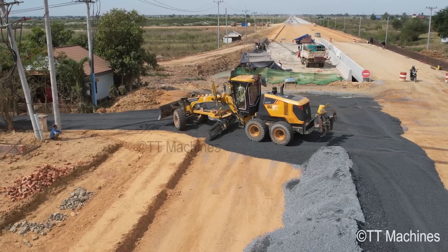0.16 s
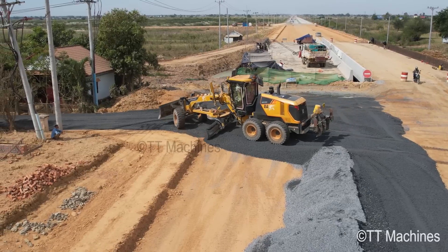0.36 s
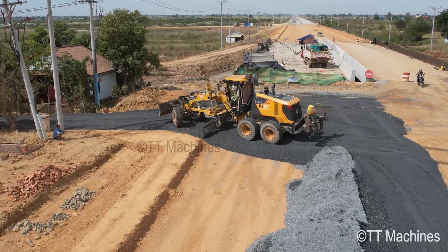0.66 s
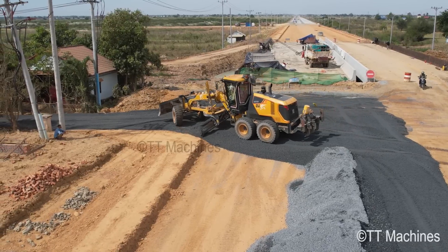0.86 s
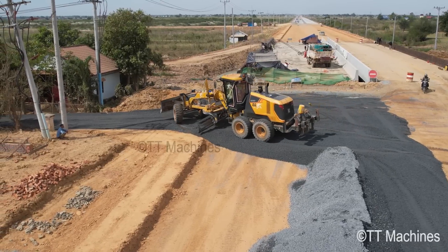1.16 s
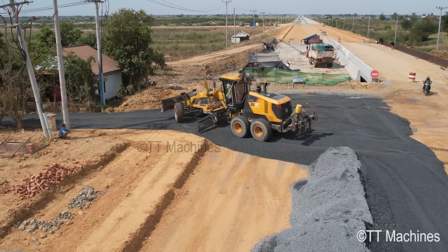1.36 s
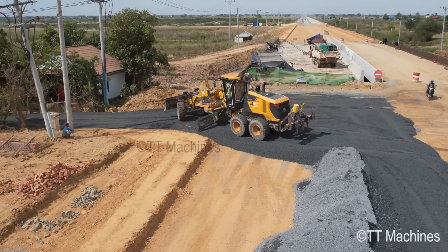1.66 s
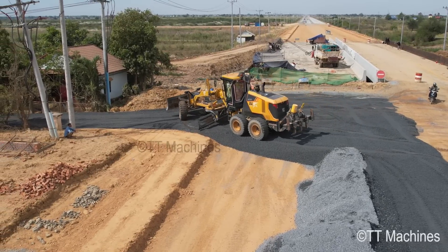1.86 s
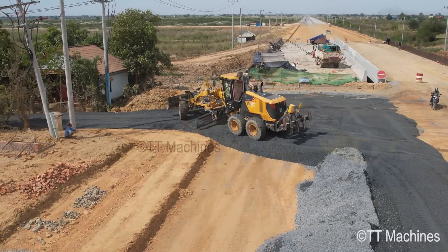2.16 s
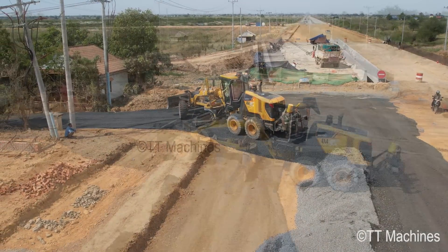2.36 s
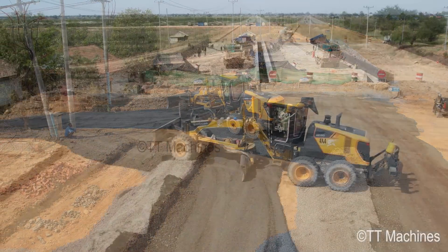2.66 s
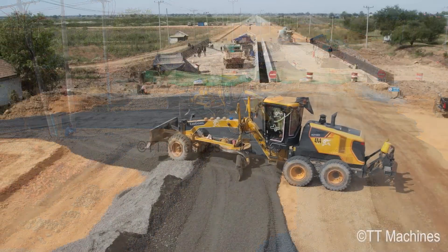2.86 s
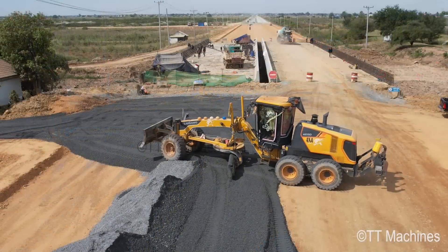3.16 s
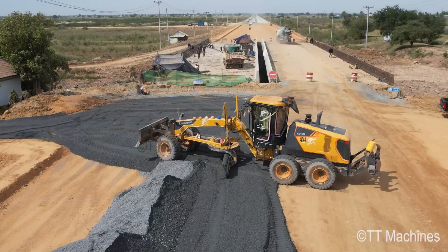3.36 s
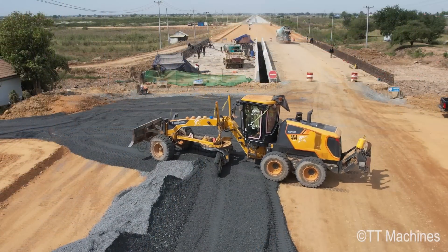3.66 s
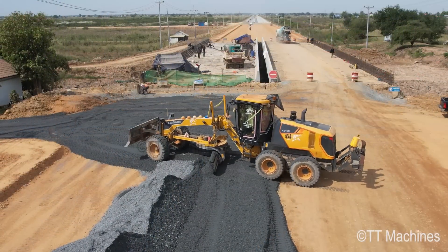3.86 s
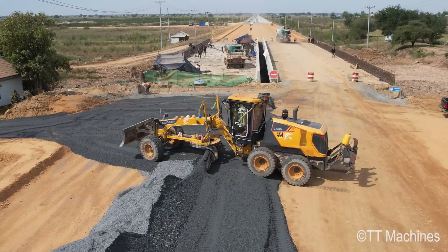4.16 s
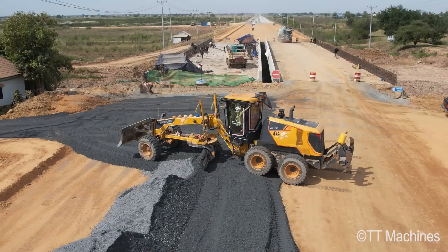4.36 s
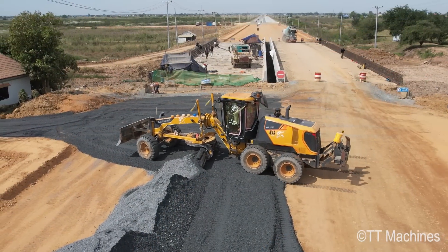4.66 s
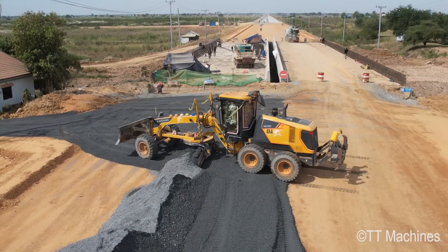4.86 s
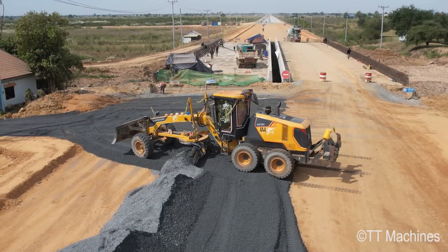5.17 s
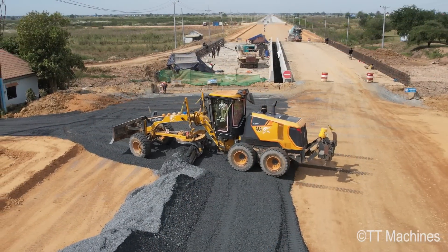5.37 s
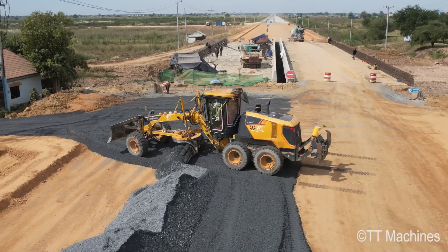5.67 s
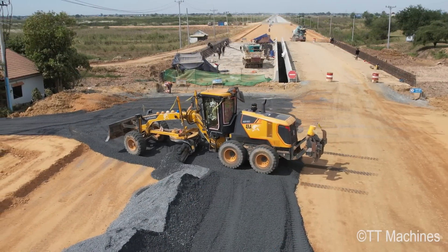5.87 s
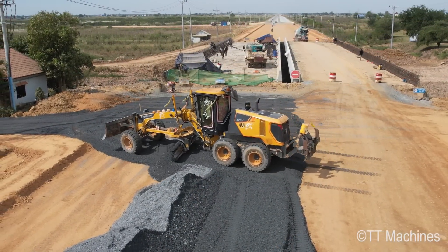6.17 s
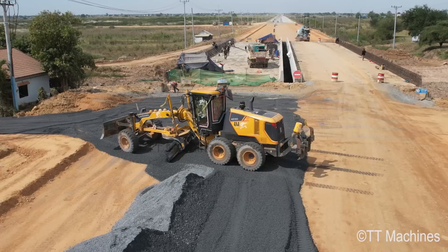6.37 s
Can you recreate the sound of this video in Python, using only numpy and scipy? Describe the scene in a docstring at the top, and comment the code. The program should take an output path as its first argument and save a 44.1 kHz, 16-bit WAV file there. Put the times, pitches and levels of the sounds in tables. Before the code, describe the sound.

A heavy diesel machine pulls hard with whining gears, drops abruptly to a duller run, two stones crack, then the exhaust boom builds again over scraping gravel.

```python
"""Road grader spreading gravel

A six-cylinder diesel road grader works on an open site, some way off. It first pulls hard, with gears,
pump and turbocharger singing, then drops abruptly to a duller run. Two stones crack, and the exhaust
boom builds up again as the blade pushes into the heap. Shaped noise makes the boom, roar, clatter,
hiss and scraping; trembling sine waves make the whines; short fading sines make the cracks."""
import sys
import numpy as np
from scipy import signal
from scipy.fft import rfft, irfft
from scipy.io import wavfile
from scipy.ndimage import uniform_filter1d

SR = 44100
rng = np.random.default_rng(int(sys.argv[2]) if len(sys.argv) > 2 else 0)


def master(y):
    """Save y as 16-bit WAV."""
    cut = np.clip(np.atleast_2d(y).T, -1, 1)
    pcm = np.round(cut * 32767)  # scale
    wavfile.write(sys.argv[1], SR, pcm.astype(np.int16))


N = 286650
TIME = np.arange(N) / SR

DROP_S = 1.922  # the hard pull ends here
BITE_S, BITE_RISE_S = 3.23, 0.27  # middle and length of the blade's bite into the heap

# exhaust boom around the firing rate: (frequency [Hz], relative level [dB per Hz])
BOOM_SPECTRUM = [(50, -40), (66, -9), (78, -3), (90, -0.5), (105, -1), (120, -4.5), (138, -11.5),
                 (175, -24)]
# the push: (time [s], share of the pushing state [0-1], colour shift by the moving ground echo [factor])
PUSH_STATE = [(2.4, 0, 0.85), (3.0, 0.4, 1.055), (3.6, 0.72, 1.06), (4.3, 0.77, 1.004), (5.2, 0.95, 1.015),
              (6.5, 1, 1.005)]
# which ear leads in phase, in the hard pull and the eased run:
# (frequency [Hz], lead [-1 left to 1 right])
HARD_EAR_LEAD = [(90, .2), (300, .8), (700, .92), (1300, .77), (1700, .3), (2400, .45), (3500, -.5),
                 (5400, -.35), (6100, -.68), (7400, -.55), (8300, .2), (9500, .83), (12000, 0)]
EASED_EAR_LEAD = [(90, 0), (1100, 0), (1750, .7), (2300, .1), (3100, -.7), (3900, 0), (6500, -.2),
                  (7400, -.4), (8300, .2), (9500, .83), (12000, 0)]


def gain_of(db):
    """Turns decibels into an amplitude factor."""
    return 10 ** (np.asarray(db) / 20)


def curve(rows):
    """Joins the points of a time table by straight lines, one curve per column."""
    s, *columns = np.transpose(rows)
    return [np.interp(TIME, s, column) for column in columns]


def read(rows, hz):
    """Reads a spectrum table along log frequency; outside it the level falls 40 dB per octave."""
    f, *columns = np.transpose(rows)
    db, *others = [np.interp(np.log(hz + 1), np.log(f), column) for column in columns]
    octaves_outside = np.abs(np.log2((hz + 1) / np.clip(hz + 1, f[0], f[-1])))
    return [db - 40 * octaves_outside] + others


def swell(middle, length):
    """A smooth hump from 0 to 1 and back."""
    return np.cos(np.pi * np.clip((TIME - middle) / length, -.5, .5)) ** 2


def rise(middle, length):
    """A straight ramp from 0 to 1."""
    return np.clip((TIME - middle) / length + .5, 0, 1)


def sway(crest, period):
    """A slow regular swing between -1 and 1."""
    return np.cos(2 * np.pi * (TIME - crest) / period)


def wander(hz):
    """Smooth random drift of rms 1, with little movement faster than hz."""
    f = np.fft.rfftfreq(N, 1 / SR)
    x = irfft(rfft(rng.standard_normal(N)) * np.exp(-(f / hz) ** 2), N)
    return x / x.std()


def steadied(x, seconds):
    """Evens out a stereo sound: divides it by the running rms of its left-right mean."""
    window = signal.windows.hann(int(seconds * SR) + 3)
    power = signal.fftconvolve(x.mean(0) ** 2, window, "same")
    power = power / signal.fftconvolve(np.ones(N), window, "same")
    return x / np.sqrt(np.abs(power) + 1e-20)


def panned(x, balance_db):
    """Places a sound between left and right; a positive balance makes the left louder."""
    return np.array([x * gain_of(balance_db / 2), x / gain_of(balance_db / 2)])


def noise(rows, likeness=.9, patchy_db=0., shift=None, lead=None, size=2048):
    """Stereo noise of a given spectrum, built from random short-time spectra with drifting patches.

    shift moves the spectrum up or down in time; lead turns the phase between the ears."""
    hop = size // 4
    frames, hz = N // hop + 2, np.fft.rfftfreq(size, 1 / SR)
    slide = np.ones(1) if shift is None else shift[np.minimum(np.arange(frames) * hop, N - 1)]
    db, *stereo = read(rows, hz / slide[:, None])
    same, balance_db = stereo or (likeness, 0)
    same = np.clip(same, -1, 1)
    ahead = 0 if lead is None else np.interp(hz, *np.transpose(lead))

    a, b, c, d, patches = rng.standard_normal((5, frames, len(hz)))
    patches = uniform_filter1d(patches, size=7, axis=0)  # smooth in time
    patches = uniform_filter1d(patches, size=12, axis=1)  # smooth in frequency
    level_db = db + patchy_db * patches / patches.std()

    # the right ear shares part of the left; the rest is turned in phase or independent
    left = a + 1j * b
    unlike = 1j * ahead * left + np.sqrt(1 - ahead ** 2) * (c + 1j * d)
    right = same * left + np.sqrt(1 - same ** 2) * unlike
    tilt = gain_of(balance_db)
    z = np.array([left * tilt, right]) / np.sqrt(1 + tilt ** 2) * gain_of(level_db)
    x = signal.istft(z.swapaxes(1, 2), nperseg=size, noverlap=size - hop)[1][:, :N]
    return x / x.mean(0).std()


def firing_throb(firings, depth, scatter):
    """Loudness that throbs with each firing; the strength varies at random between firings."""
    strength = 1 + scatter * rng.standard_normal(1000)
    return 1 + depth * strength[firings.astype(int)] * (1 - np.cos(2 * np.pi * firings))


def hum(firings, orders, flutter):
    """Clean shaft tones, each fluttering a little on its way through the air."""
    tones = 0
    for multiple, db in orders:
        phase = 2 * np.pi * (multiple * firings + rng.random())
        steady = (1 + flutter * wander(4.6)) * np.sin(phase)
        tones = tones + gain_of(db) * (steady + flutter * wander(7.0) * np.cos(phase))
    return tones


def whistle(hz, db, jitter, flutter_db):
    """A sine tone whose pitch and strength tremble; db is its rms level before the trembling."""
    phase = 2 * np.pi * np.cumsum(hz * (1 + jitter * wander(38.1))) / SR
    return np.sqrt(2) * gain_of(db + flutter_db * wander(28)) * np.sin(phase)


def resonate(x, hz, width):
    """Shifts the curve hz down to zero, smooths twice, and shifts back: a steep moving resonance."""
    turn = np.exp(2j * np.pi * np.cumsum(hz) / SR)
    r = np.exp(-np.pi * width / SR)
    y = (turn * signal.lfilter([1], [1, -2 * r, r * r], x / turn)).real
    return y / y.std()


def rumble():
    """The machine's weight shakes the ground in slow surges: deep noise with a moving level."""
    # loudness: (time [s], level [dB])
    loudness = [(0, -36), (1.5, -31.5), (2.5, -45.5), (3.3, -40), (4.1, -43), (4.9, -32.5), (6.5, -37.5)]
    # colour: (frequency [Hz], relative level [dB per Hz])
    spectrum = [(25, -36), (35, -21), (45, -14), (54, -7), (63, -1.5), (76, -23)]
    x = noise(spectrum, likeness=0.75, size=8192)
    return gain_of(curve(loudness)[0]) * steadied(x, 0.27)


def clatter_fill():
    """Soft mid-range noise fills the light clatter until the bite, with one short swell of treble."""
    # mid-range fill and treble swell: (frequency [Hz], relative level [dB per Hz])
    fill_spectrum = [(1450, -13), (1750, -2), (2080, -4), (2300, -10)]
    treble_spectrum = [(3000, -8), (3450, 2), (4000, -1), (5000, -11), (6000, -8), (6900, -2), (7800, -9),
                       (9000, -11)]
    fill = noise(fill_spectrum, likeness=.8, patchy_db=3.0)
    fill = gain_of(-47) * (1 - rise(BITE_S, BITE_RISE_S)) * fill
    treble = noise(treble_spectrum, likeness=.2, lead=EASED_EAR_LEAD)
    return fill + gain_of(-44.5) * swell(2.3, .7) * treble


def whines():
    """Thin, trembling tones of the machine and its blade surface from the clatter and sink back."""
    # (start [s], end [s], centre pitch [Hz], level before panning [dB])
    tones = [(2.0, 3.2, 610, -51), (2.0, 3.1, 975, -53), (2.0, 2.35, 1378, -51), (2.05, 2.4, 1075, -49),
             (2.15, 2.48, 2822, -49.5), (2.3, 4.5, 2450, -49.5), (2.68, 3.12, 1398, -47.5),
             (2.0, 4.0, 1287, -52), (3.1, 5.7, 1882, -56), (3.25, 4.0, 2342, -52), (4.25, 6.6, 2322, -53),
             (4.1, 6.6, 1653, -59), (4.7, 6.6, 1556, -56), (4.2, 6.6, 3308, -59)]
    fade_s = 0.13
    out = 0
    for start, end, hz, db in tones:
        gate = rise(start, fade_s) * (1 - rise(end, fade_s))
        pitch = hz * (1 + .0015 * wander(4))
        out = out + gate * whistle(pitch, db, jitter=0.003, flutter_db=3)
    return panned(out, -8.5)


def drone():
    """The loaded frame drones a little above the exhaust boom as the blade fills."""
    # (frequency [Hz], relative level [dB per Hz])
    spectrum = [(118, -28), (143, 2), (170, 2), (200, -19)]
    x = steadied(noise(spectrum, likeness=1.0, size=8192), 0.36)
    return gain_of(-35) * rise(4.8, 1.1) * x


def stones():
    """Stones crack under the tyres: each sharp tick falls from treble to a short knock."""
    # the cracks: (time [s], peak level before panning [dB], left-right balance [dB])
    cracks = [(2.7425, -12.6, 1.5), (2.7878, -21, 1.5)]
    # ringing; the lower modes start later:
    # (frequency [Hz], relative level [dB], time to fade by 60 dB [s], delay [s])
    modes = [(400, -8, .008, .0012), (900, -3.5, .007, .001), (1500, -4, .005, .001),
             (2400, -6, .004, .001), (3750, -1.5, .006, .0006), (5000, -2.5, .004, .0004),
             (5700, -2.5, .004, .0003), (7500, 1, .003, .0001), (8300, 0, .003, 0), (9100, 0, .003, 0),
             (10100, -6, .003, 0), (13200, -9, .003, 0)]
    t = np.arange(SR // 50) / SR
    tick = 0
    for hz, db, t60, delay in modes:
        age = np.maximum(t - delay, 0)
        attack = 1 - np.exp(-age / .00025)
        ring = np.sin(2 * np.pi * (hz * age + rng.random()))
        tick = tick + attack * gain_of(db - 60 * age / t60) * ring
    tick = tick / np.abs(tick).max()

    out = np.zeros((2, N))
    for s, db, balance_db in cracks:
        start = round(s * SR)
        out[:, start:start + len(t)] += panned(gain_of(db) * tick, balance_db)
    return out


def scraping():
    """How hard the gravel rubs the blade: lightly after the bite, in shoves once it is full."""
    # shoves of gravel against the full blade: (middle [s], length [s], rise [dB])
    shoves = [(5.03, .3, 10.5), (5.42, .3, 10), (5.77, .28, 11.5), (6.1, .2, 8.5), (6.48, .3, 9.5)]
    light_db, full_db = -50, -48.5
    full = rise(4.9, 0.18)
    shoves_db = sum(db * np.sqrt(swell(s, length)) for s, length, db in shoves)
    level_db = (1 - full) * light_db + full * full_db + shoves_db
    return np.clip((TIME - BITE_S) / 1.1, 0, 1) * gain_of(level_db)


def blade():
    """Scraping gravel keeps the blade's modes ringing, and its clearest note grows with each shove."""
    # ringing: (pitch before the colour shift [Hz], width [Hz], relative level [dB], left-right balance [dB])
    modes = [(1082, 77, -0.5, -1), (2306, 43, -10, -4), (2890, 110, -11.5, -3), (3313, 45, -13.5, -6),
             (4070, 130, -26, 3), (4430, 62, -19, 8)]
    shift = curve(PUSH_STATE)[1] * (1 + 0.0084 * wander(5.1))
    ring = 0
    for hz, width, db, balance_db in modes:
        mode = resonate(rng.standard_normal(N), hz * shift, width)
        ring = ring + panned(gain_of(db) * mode, balance_db)
    # the note's level is relative to the scraping
    note = whistle(1155 * (1 + .003 * wander(5)), -4.5, jitter=.004, flutter_db=2)
    return scraping() * (ring + note)


def squeaks():
    """Now and then a thin tone glides in pitch, swelling and fading as it goes."""
    # faint gliding squeaks near 2.9 kHz:
    # (start [s], length [s], start pitch [Hz], end pitch [Hz], level at the middle before panning [dB])
    glides = [(2.73, .18, 2780, 2950, -47.5), (3.15, .16, 2790, 2950, -47), (3.51, .14, 2780, 3010, -44),
              (4.5, .2, 2910, 2880, -48), (4.88, .15, 2720, 2980, -45), (5.94, .14, 2680, 3000, -44.5),
              (6.11, .16, 3020, 2700, -44.5), (6.285, .14, 2740, 3020, -42)]
    out = 0
    for s, length, start_hz, end_hz, db in glides:
        u = np.clip((TIME - s) / length, 0, 1)  # progress through the squeak
        pitch = start_hz + (end_hz - start_hz) * u
        squeak = whistle(pitch, db, jitter=.006, flutter_db=2.4)
        out = out + panned(squeak * np.sin(np.pi * u), -4)
    return out


def gears():
    """Tooth-mesh whines follow the drive train's speed and swell and fade."""
    # drive train speed: (time [s], factor on the whines)
    drive = [(0, .988), (.35, .992), (.6, 1.002), (1.0, 1.005), (1.35, 1.004), (1.55, 1.002), (1.75, 1.007),
             (1.92, 1.001)]
    # the main mesh, loudest at first: (time [s], level before panning [dB])
    mesh = [(0, -31.5), (.22, -40.5), (.35, -36), (.48, -50), (.8, -47), (1.04, -38), (1.17, -42),
            (1.35, -35), (1.52, -47), (1.68, -40.5), (1.9, -52)]
    # whines: (pitch at drive factor 1 [Hz], left-right balance [dB], level before panning [dB],
    #          swing [dB], crest [s], period [s])
    gear_whines = [(803, -2, -39.5, 3.5, .8, 1.9), (2006, 0, -48.5, 2.5, .87, .6),
                   (3205, -3, -50.5, 1.5, .9, 1.8), (4302, -1, -52, 1.5, 1.2, 1.4)]
    ratio = curve(drive)[0] * (1 + 0.0005 * wander(3.13))
    main_mesh = whistle(1434 * ratio, curve(mesh)[0], jitter=0.0012, flutter_db=1.3)
    out = panned(main_mesh, -3)
    for hz, balance_db, db, swing_db, crest, period in gear_whines:
        level_db = db + swing_db * sway(crest, period)
        tone = whistle(hz * ratio, level_db, jitter=0.0018, flutter_db=2.0)
        out = out + panned(tone, balance_db)
    return out


def pump(firings):
    """The hydraulic pump growls at its piston rate; two harmonics throb once every two firings."""
    # (time [s], piston strokes [per s], growl level [dB],
    #  lower and upper harmonic levels before throb and panning [dB])
    strokes = [(0, 230.4, -37, -53, -49), (.22, 231.5, -33, -50, -40.5), (.4, 232.0, -35, -43.5, -47),
               (.54, 234.3, -35, -39.5, -44), (.76, 234.0, -28, -45, -42.5), (1.0, 235.7, -30, -55, -39.5),
               (1.14, 235.3, -32, -52, -54), (1.25, 234.6, -29, -46, -41.5), (1.36, 234.0, -32, -40, -44),
               (1.45, 233.5, -33, -50, -42), (1.56, 233.2, -31, -45.5, -42), (1.66, 234.0, -30, -43.5, -52),
               (1.76, 236.0, -24, -41, -38.5), (1.92, 235.1, -24.5, -38, -43.5)]
    rate, growl_db, lower_db, upper_db = curve(strokes)
    growl = whistle(rate, growl_db, jitter=0.012, flutter_db=1.5)
    throb = 1 + 0.45 * np.cos(np.pi * firings)
    tones = whistle(11 * rate, lower_db, jitter=0.0011, flutter_db=1.5)
    tones = tones + whistle(12 * rate, upper_db, jitter=0.0011, flutter_db=1.5)
    return growl + panned(throb * tones, -1.5)


def turbo(hz, db):
    """The compressor's wavering whistle, scattered differently towards each side."""
    hz = hz * (1 + 0.00157 * wander(6.25))
    direct = panned(whistle(hz, db - 1.0, jitter=0.00136, flutter_db=1.0), 9.1)
    scattered = [whistle(hz, db - 6.0, jitter=0.00299, flutter_db=3.5) for side in "LR"]
    return direct + np.array(scattered)


def loaded_turbo():
    """The turbocharger whistle sags in pitch under the load and surges in loudness."""
    # (time [s], pitch [Hz])
    pitch = [(0, 7228), (.28, 7218), (.65, 7180), (1.0, 7162), (1.3, 7125), (1.6, 7162), (1.92, 7150)]
    # (middle [s], length [s], rise [dB])
    surges = [(.27, 0.85, 8), (1.107, 1, 9), (1.792, 0.41, 8.5)]
    level_db = -44 + sum(db * swell(s, length) for s, length, db in surges)
    return turbo(curve(pitch)[0], level_db)


def eased_boom(firings, bite, surge_db):
    """Turbulence and firing tones make a lumpy boom of changing level that sags now and then."""
    # boom level, lumpy at first, fuller after the bite: (time [s], level [dB])
    boom_levels = [(1.93, -25), (2.12, -33), (2.27, -25.5), (2.44, -37), (2.57, -28), (2.75, -33.5),
                   (3.2, -29), (3.32, -21), (3.48, -26.5), (3.66, -20.5), (6.5, -19.5)]
    # tones below, at and above the firing rate: (multiple of the firing rate, relative level [dB])
    orders = [(.802, -9.3), (1, -1.2), (1.5, -22), (1.731, -17), (2, -25), (2.333, -17), (3, -26),
              (4.16, -28), (6, -31), (6.167, -29), (9.83, -33)]
    # brief sags: (middle [s], length [s], change [dB])
    sags = [(3.9, .12, -6), (4.87, .24, -4), (5.18, .14, -7), (5.92, .14, -4), (6.19, .12, -7)]
    tones_db = (1 - bite) * 1 + bite * 5
    tones = gain_of(tones_db) * hum(firings, orders, flutter=0.16)
    throb = gain_of(-1.3) * noise(BOOM_SPECTRUM, likeness=0.85, size=8192) + tones
    lumps_db = ((1 - bite) * 1.2 + bite * 0.8) * wander(14)
    sag_db = sum(db * swell(s, length) for s, length, db in sags)
    level_db = curve(boom_levels)[0] + surge_db + lumps_db + sag_db
    return gain_of(level_db) * steadied(throb, 0.5)


def eased_pipe(firings, bite, surge_db):
    """The pipe's throbbing noise roars up as the blade bites, then settles."""
    # (frequency [Hz], relative level [dB per Hz], left-right likeness [-1 to 1], left-right balance [dB])
    spectrum = [(107, -47, 0.65, 8), (141.5, -6.5, 0.24, 12), (208, -4, 0.75, -12.5),
                (229, -0.5, 0.97, 2.5), (319, -9.5, 0.59, -1.5), (371, -5.5, 0.64, -0.5),
                (411, -15.5, 0.88, 4), (476, -21.5, 0.18, 0), (620, -41, 0.42, -2)]
    light_db = -35
    bite_db = -27 - 2 * (TIME - BITE_S)  # settles by 2 dB per second
    pipe_db = (1 - bite) * light_db + bite * bite_db
    roar = noise(spectrum, size=4096) * firing_throb(firings, 0.22, 0.88)
    return gain_of(pipe_db + surge_db) * steadied(roar, 0.54)


def eased_clatter(firings, drift):
    """Engine clatter crosses from light running to pushing, as the ground echo shifts its colour."""
    # running light and pushing: (frequency [Hz], relative level [dB per Hz],
    #                             left-right likeness [-1 to 1], left-right balance [dB])
    light_spectrum = [(380, -10, 0.21, -2), (512, -5.5, -0.078, 1), (715, 0.5, 0.61, 1),
                      (920, -5, 0.072, 1), (1190, -6.5, 0.24, -5), (1324, 0.5, 0.85, 3.5),
                      (1600, -7.5, -0.84, -7.5), (1870, -11, 0.26, -13), (2200, -9.5, 0.71, -1),
                      (2420, -8, 0.57, -6), (3020, -7.5, 0.78, -8.5), (3455, -8.5, -0.38, -10),
                      (4250, -74, 0.16, 7)]
    push_spectrum = [(350, -40, 0.94, -2), (421, -8, 0.75, 0), (520, -5, 0.8, 2), (644, -2.5, 0.91, -1.5),
                     (850, -5.5, 0.84, -0.5), (880, -15, 0.22, -1), (1110, -3, 0.96, -1.5),
                     (1348, -8.5, 0.62, -3), (1340, -16.5, -0.26, 3), (1620, -9.5, 0.87, 1.5),
                     (2030, -12.5, 0.81, -4), (2320, -8.5, 0.77, -1), (2550, -12.5, 0.93, -9),
                     (3170, -11.5, -0.62, -4), (4000, -40, -0.84, 7)]
    push, shift = curve(PUSH_STATE)
    light, heavy = np.sqrt(np.clip([1 - push, push], 0, 1))
    level_db = (1 - push) * -35 + push * -32 + 0.21 * drift
    x = light * noise(light_spectrum, lead=EASED_EAR_LEAD, patchy_db=1.44)
    x = x + heavy * noise(push_spectrum, lead=EASED_EAR_LEAD, patchy_db=1.5, shift=shift)
    return gain_of(level_db) * steadied(x * firing_throb(firings, 0.032, 0.59), 0.14)


def eased_hiss(firings, drift):
    """Hiss of air and gravel crosses from light running to pushing, with one gentle gravel swell."""
    # running light and pushing: (frequency [Hz], relative level [dB per Hz],
    #                             left-right likeness [-1 to 1], left-right balance [dB])
    light_spectrum = [(2900, -30, -0.12, 0), (3700, 0.0, -0.12, -7.0), (4600, -3.8, -0.27, -2.6),
                      (6000, -7.0, 0.46, 1.8), (7300, -2.3, -0.42, 4.5), (8000, -8.7, 0.43, 5.8),
                      (8600, -10.9, 0.93, -0.1), (9700, -8.6, -0.16, 0.1), (11200, -19, -0.5, -0.2),
                      (12800, -21, -0.06, 0.3), (14300, -21, 0.7, -0.1), (15500, -39.9, 0.85, 0.0)]
    push_spectrum = [(2900, -31, -0.28, 0), (3650, -0.8, -0.28, 3.7), (4200, 0.0, 0.78, 2.6),
                     (5200, -2.6, 0.03, 2.1), (6100, -3.3, 0.43, 4.8), (7000, -2.3, 0.08, -0.1),
                     (7650, -3.4, -0.42, 5.2), (8500, -4.2, 0.93, 1.7), (9700, -1.6, -0.12, -0.3),
                     (11200, -9.5, -0.7, 0.1), (12800, -12.9, -0.02, 0.1), (14300, -17.6, 0.93, -0.0),
                     (15500, -23.6, 0.8, -0.0)]
    push = curve(PUSH_STATE)[0]
    light, heavy = np.sqrt(np.clip([1 - push, push], 0, 1))
    level_db = (1 - push) * -45.5 + push * -44.5 + 2.7 * swell(2.55, 1.0) + 0.2 * drift
    x = light * noise(light_spectrum, lead=EASED_EAR_LEAD, patchy_db=2.0)
    x = x + heavy * noise(push_spectrum, lead=EASED_EAR_LEAD, patchy_db=1.6)
    return gain_of(level_db) * steadied(x * firing_throb(firings, 0.057, 0.99), 0.18)


def eased_run(firings):
    """Light running turns into a steady push once the blade bites and loads the engine."""
    bite = rise(BITE_S, BITE_RISE_S)
    surge_db = 1.5 * swell(3.36, 0.14)  # the engine surges once as it takes the load
    drift = wander(4.0)  # the sound swims a little on the open air
    engine = eased_boom(firings, bite, surge_db) + eased_pipe(firings, bite, surge_db)
    engine = engine + eased_clatter(firings, drift) + eased_hiss(firings, drift)
    # a faint trace of the turbo whistle dies away by 35 dB per second
    trace = turbo(7500, -52 - 35 * np.maximum(TIME - DROP_S, 0))
    return clatter_fill() + whines() + drone() + blade() + squeaks() + trace + engine


def hard_boom(firings):
    """Turbulent boom, a firing note and shaft tones: fullest near the start, then weaker."""
    # (time [s], turbulence level [dB], firing note level before panning [dB])
    boom_levels = [(0, -23, -25), (.15, -22.5, -22.5), (.35, -23.5, -22.5), (.65, -24.5, -25.5),
                   (.9, -26, -35), (1.03, -26, -24), (1.17, -26.5, -33), (1.4, -27, -29.5),
                   (1.6, -27, -24.5), (1.92, -27, -27.5)]
    # tones above the firing rate: (multiple of the firing rate, relative level [dB])
    orders = [(1.5, -15), (1.731, -13), (3.461, -11), (4, -14.5), (4.667, -17), (5.186, -14), (5.667, -22),
              (6, -21), (10, -25), (11, -23), (11.5, -26), (22, -32), (23.63, -33)]
    boom_db, note_db = curve(boom_levels)
    boom = gain_of(boom_db) * steadied(noise(BOOM_SPECTRUM, likeness=0.93, size=8192), 0.31)
    note = np.sqrt(2) * gain_of(note_db) * np.sin(2 * np.pi * firings)
    tones = gain_of(-20) * hum(firings, orders, flutter=0.23) + note
    return boom + panned(tones, 1.0)


def hard_pipe(firings):
    """The pipe roars in swells as the engine labours: noise that throbs with the firings."""
    # swells: (time [s], level [dB])
    roar_levels = [(0, -22), (.3, -21.5), (.7, -21.5), (.9, -22), (1.08, -21.5), (1.25, -20), (1.5, -21.5),
                   (1.7, -18.5), (1.92, -20)]
    # (frequency [Hz], relative level [dB per Hz], left-right likeness [-1 to 1], left-right balance [dB])
    spectrum = [(105, -57, 0.77, 3), (140, -13, 0.51, 4), (188, -6, 0.5, 1.5), (220, 1.8, 1, 0),
                (280, -2, 0.69, -1.5), (354, -9, 0.73, -3), (477, -7, 0.77, 1.5), (650, -55, 0.52, 2)]
    x = noise(spectrum, lead=HARD_EAR_LEAD, patchy_db=1.5, size=4096)
    x = x * firing_throb(firings, 0.4, 0.45)
    return gain_of(curve(roar_levels)[0]) * steadied(x, 0.092)


def hard_clatter(firings):
    """Engine clatter under load: mid-range noise that throbs slightly with the firings."""
    # (frequency [Hz], relative level [dB per Hz], left-right likeness [-1 to 1], left-right balance [dB])
    spectrum = [(380, -37, 0.43, -7), (492, -2, 0.084, -5), (712, 1.5, 0.055, -0.5), (795, -2, 0.5, -10),
                (870, -3.5, 0.25, 1.5), (1240, -4, -0.69, -5), (1400, -4, -0.56, -1.5),
                (1700, -8.5, -0.77, -1), (2260, -14, -0.14, 1), (2790, -9, -0.7, -0.5),
                (2880, -15.5, 0.26, -3), (3480, -15, 0.39, -5), (4400, -49, 0.52, -1)]
    x = noise(spectrum, lead=HARD_EAR_LEAD, patchy_db=1.5) * firing_throb(firings, .05, 0.67)
    return gain_of(-28.5) * steadied(x, 0.29)


def hard_hiss(firings):
    """Bright hiss of air and gravel: treble noise that weakens slowly."""
    # (frequency [Hz], relative level [dB per Hz], left-right likeness [-1 to 1], left-right balance [dB])
    spectrum = [(2900, -31, 0.54, 0), (3700, -0.7, 0.54, -3.5), (4300, -1.6, 0.63, -1.2),
                (5400, -5.3, -0.06, 7.9), (6700, 0.0, 0.37, 5.9), (7600, -1.4, 0.37, 4.7),
                (8500, -2.7, 0.93, -0.8), (9700, -2.1, -0.04, 0.0), (11200, -7, -0.7, -0.0),
                (12800, -10.5, 0.01, 0.0), (14300, -11.5, 0.7, -0.1), (15500, -67.1, 0.39, 0.3)]
    x = noise(spectrum, lead=HARD_EAR_LEAD, patchy_db=0.5) * firing_throb(firings, 0.073, 0.97)
    return gain_of(-33.5 - 0.67 * TIME) * steadied(x, 0.38)  # falls 0.67 dB per second


def hard_pull(firings):
    """Full load: booming exhaust, roaring pipe, clatter and bright hiss, with singing machinery."""
    engine = hard_boom(firings) + hard_pipe(firings) + hard_clatter(firings) + hard_hiss(firings)
    return gears() + pump(firings) + loaded_turbo() + engine


def scene():
    """One crankshaft paces the engine; the hard pull gives way within a few milliseconds."""
    # engine speed: (time [s], firings before a slight random drift [per s])
    engine_speed = [(0, 100.5), (.6, 101.0), (1.9, 101.1), (2.1, 99.5), (4, 99.1), (6.5, 99.1)]
    speed = curve(engine_speed)[0] * (1 + 0.00168 * wander(2.68))
    firings = np.cumsum(speed) / SR  # running count of firings
    eased = rise(DROP_S, 0.0044)
    grader = np.sqrt(1 - eased) * hard_pull(firings) + np.sqrt(eased) * eased_run(firings)
    return rumble() + stones() + grader


def record(dry):
    """A steep low-pass filter removes the treble above about 15.8 kHz."""
    low_pass = signal.firwin(511, 15800, window=("kaiser", 9), fs=SR)
    return signal.oaconvolve(dry, low_pass[None], "same")


dry = scene()
out = record(dry)
master(out)
```